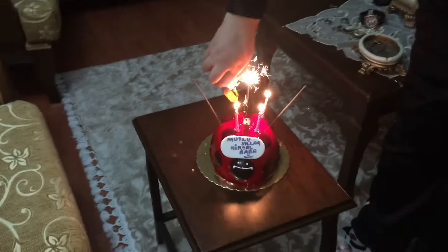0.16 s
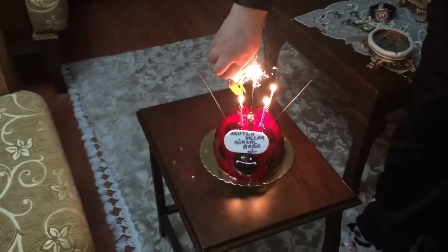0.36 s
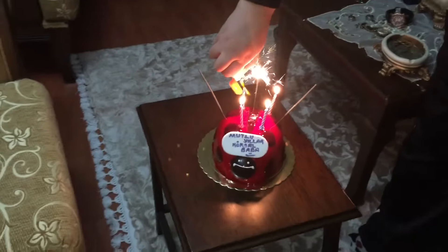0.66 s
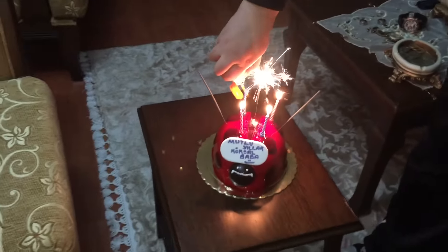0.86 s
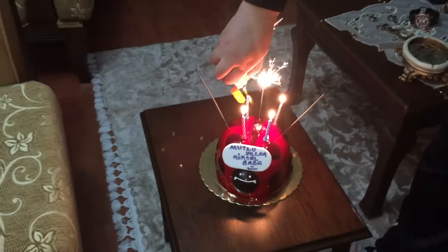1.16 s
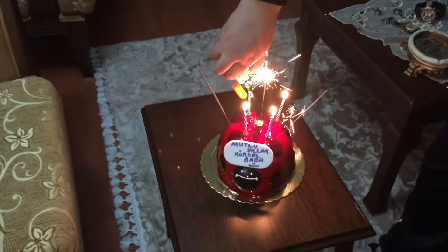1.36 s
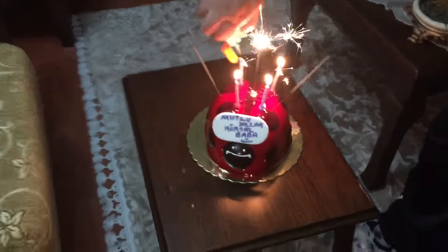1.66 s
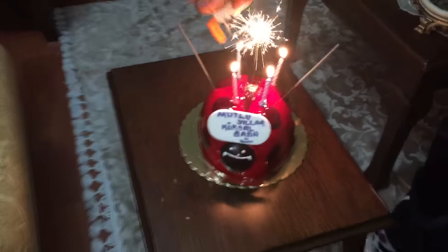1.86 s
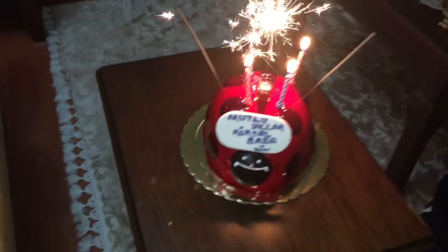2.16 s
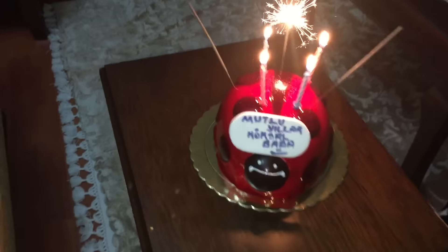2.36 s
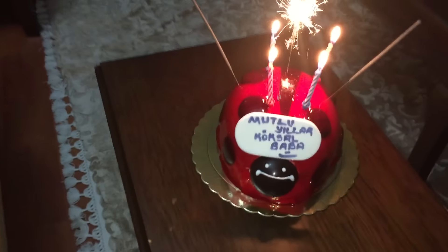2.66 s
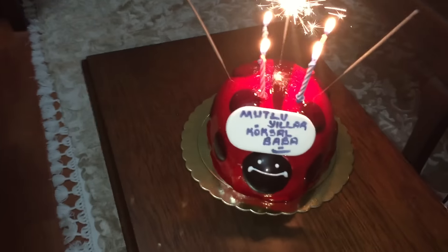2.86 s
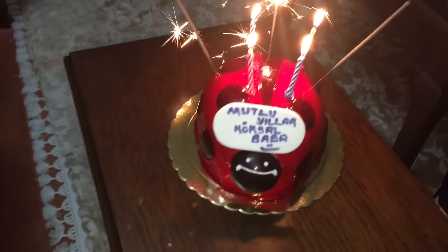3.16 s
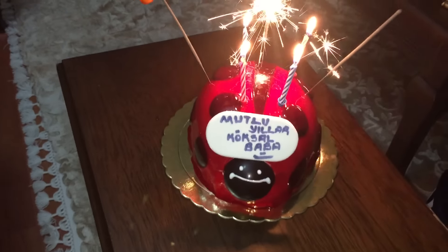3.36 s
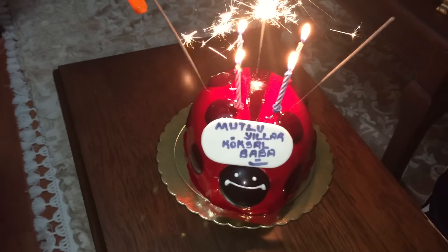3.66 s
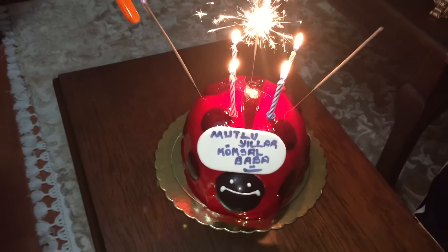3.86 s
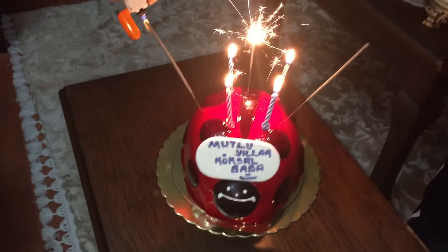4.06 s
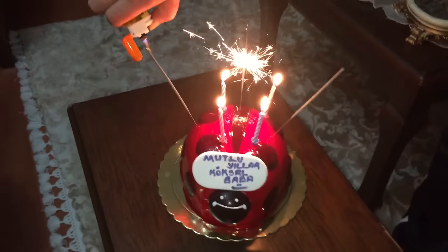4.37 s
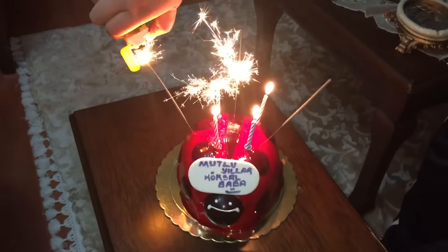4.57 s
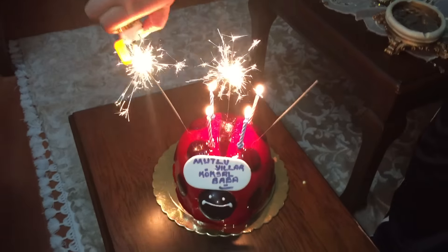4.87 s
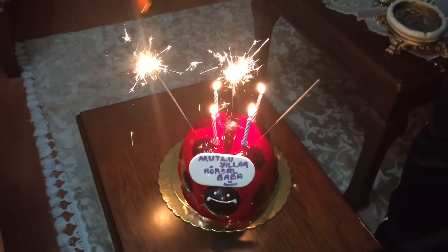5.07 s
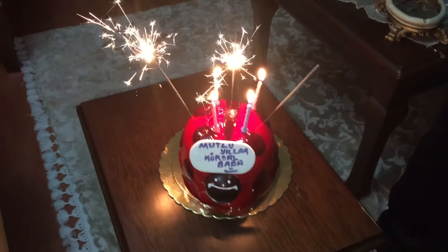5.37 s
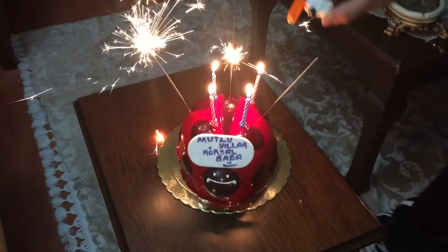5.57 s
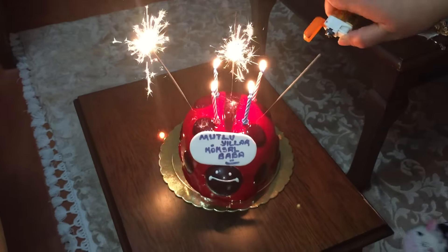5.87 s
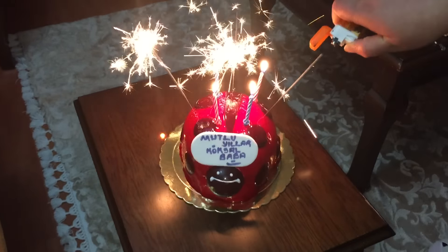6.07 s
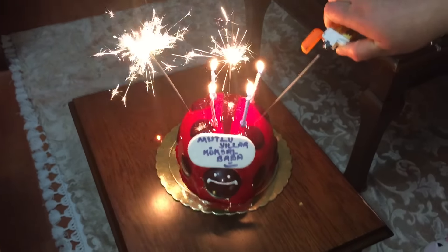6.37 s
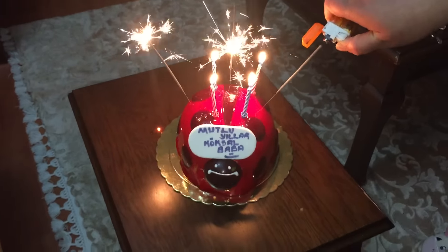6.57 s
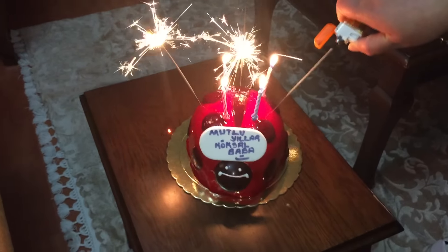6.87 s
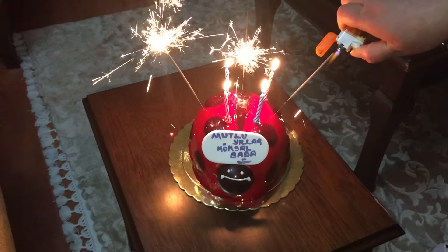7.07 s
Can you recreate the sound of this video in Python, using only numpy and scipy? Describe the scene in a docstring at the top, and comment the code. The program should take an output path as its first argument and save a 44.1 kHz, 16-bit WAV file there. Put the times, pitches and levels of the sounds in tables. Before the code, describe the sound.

A faint sizzling hiss swells into lively sparkler crackle, broken by hard, bright plastic lighter clicks in a quiet carpeted living room.

```python
"""Sparklers and a gas lighter, carpeted living room

Sparklers burn on a cake: a flickering fizz of tiny noise bursts over hiss, flaring up, with scattered pops.
A hand works a gas lighter, close and mostly direct: its trigger snaps loudly and ticks on release, each
blow a noise rattle through the modes of the body. Dull knocks are pushes of noise through a resonance.
Behind them the walls answer with decaying bands of noise; filtered noise gives the house rumble, hand on
the recorder and room tone. One microphone channel; the microphone moves over the table."""
import sys
import numpy as np
from scipy import signal
from scipy.fft import rfft, irfft, next_fast_len
from scipy.io import wavfile

SR = 44100
rng = np.random.default_rng(int(sys.argv[2]) if len(sys.argv) > 2 else 0)


def materialize(psi):
    """Save the field psi as 16-bit PCM at rate SR to the path in sys.argv[1].

    A 1-D psi becomes a single channel; in a 2-D psi each row is a channel.
    """
    bounded = np.clip(np.atleast_2d(psi).T, -1, 1)
    quanta = np.round(bounded * 32767).astype(np.int16)
    wavfile.write(sys.argv[1], SR, quanta)


N = 317961   # samples

# house and hand rumble over time: t/s, level of the 110 Hz rumble/dB, level of the deeper part/dB
RUMBLE_LEVELS = [(0, -65, -70), (.5, -72, -65), (.8, -66, -76), (1.33, -61, -69.5), (1.4, -68, -53.5),
                 (1.9, -57.5, -57), (2.2, -66.5, -68), (3.0, -66, -68), (3.5, -62.5, -61),
                 (4.2, -64.5, -70), (4.9, -63, -62.5), (5.6, -66, -69.5), (6.2, -65.5, -63.5),
                 (6.9, -62.5, -77), (7.21, -65, -66)]
# brief swells of the 110 Hz rumble: t of the top/s, top level/dB, last 10 dB of rise/ms, 10 dB of fall/ms
RUMBLE_SWELLS = [(.5, -61, 58, 150), (.86, -59, 100, 52), (1.375, -50, 8, 60), (1.45, -53, 30, 60),
                 (1.86, -69, 40, 84), (2.63, -56, 30, 100), (3.07, -53, 37, 38), (3.87, -51, 18, 60),
                 (4.34, -59, 28, 65), (4.851, -50, 40, 50), (5.14, -53.5, 100, 40), (5.5, -54, 39, 110),
                 (6.24, -57, 30, 150), (6.95, -56, 52, 48)]
# spectra of the rumble, its deeper part and the room tone, relative: f/Hz, density/dB per Hz
RUMBLE_SPECTRUM = [(60, -22), (85, -4.5), (113, 4.5), (131, 3), (160, -9), (200, -17.5), (250, -18),
                   (400, -33)]
DEEP_SPECTRUM = [(18, -80), (33, -52), (42, -23), (55, -1), (75, 2), (95, 1.5), (150, -61)]
AIR_SPECTRUM = [(100, -27), (170, -3.5), (290, 5.5), (400, 0.5), (480, -23), (1000, -29), (2100, -26),
                (5200, -47), (7500, -40), (8000, -27), (9500, -7.5), (10600, -11), (15740, -42),
                (15840, -70)]
# room tone over time: t/s, level/dB
AIR_LEVELS = [(0, -71.5), (1.5, -71), (2.2, -65.5), (2.7, -75), (4.2, -64), (5.0, -64), (5.4, -69),
              (6.4, -67), (7.21, -68)]
# decay of the room: f/Hz, t60/s
ROOM_DECAY = [(300, 0.16), (2100, 0.4), (4000, 0.39), (12000, 0.24)]
# strength of the room's answer: f/Hz, level/dB
ROOM_LEVELS = [(300, -30), (900, -45), (1500, -27), (2150, -23), (2800, -30.5), (3600, -30.5), (5000, -26),
               (6500, -29.5), (8500, -30.5), (12000, -30.5), (15500, -29.5)]
# dull knocks and low hand thumps: t/s, peak level/dB, f/Hz, width/Hz
KNOCK_EVENTS = [(0.2625, -53, 746, 220), (0.266, -47.5, 556, 160), (0.479, -49, 133, 50),
                (0.519, -56, 91, 40), (0.589, -51, 139, 60), (0.708, -46.5, 528, 60), (1.038, -52, 130, 70),
                (1.359, -43, 71.6, 40), (1.375, -48, 560, 200), (1.44, -44, 99, 40),
                (1.574, -48.5, 90, 40.2), (1.629, -53, 130, 60), (1.842, -46, 65, 30),
                (1.889, -48.5, 70, 40), (2.305, -45, 617, 150), (3.166, -42.5, 567, 150),
                (3.285, -47, 840, 200), (3.552, -49, 550, 150), (3.584, -46.5, 597, 150),
                (3.856, -38, 181, 80), (3.912, -48, 600, 150), (4.259, -49, 683, 150),
                (4.557, -49.5, 583, 150), (5.126, -41.5, 840, 350), (5.631, -44.5, 630, 150),
                (5.835, -49, 870, 150), (6.184, -46, 656, 150), (7.055, -51.5, 648, 148),
                (7.122, -37.5, 220, 110), (7.123, -40.5, 110, 60)]
# lighter trigger: t/s, peak level/dB, rattle t60 at 3 kHz/s, tilt/dB per octave, modes above 9 kHz/dB,
# hardest-hit tone f/Hz, second tone f/Hz, its level re the first/dB, third tone f/Hz, its level re the
# first/dB, all three tones re the body/dB, thump re the peak/dB
TRIGGER_EVENTS = [(2.048, -14.5, 0.007, 2.5, 0, 6060, 4520, -1, 8900, -3, 8, -34),
                  (2.8322, -4.5, 0.01, -1.9, 1.5, 3700, 5000, -1, 12800, -7, 8, -31),
                  (3.5052, -18, 0.0032, 2, -1, 5000, 3730, -3, 14100, -4, 3.5, -32),
                  (3.853, -3.5, 0.008, -1.7, 3.5, 4500, 1900, -0.5, 3880, 0, 5, -41),
                  (5.1563, -17, 0.0056, 5, -1.5, 4330, 2860, -1, 6160, 2, 8, -38),
                  (6.2007, -5, 0.012, 3.5, -5.5, 3670, 2160, 4.5, 6770, -7.5, 10, -34),
                  (6.739, -18, 0.0093, 4, 0, 4430, 7300, -0.5, 2310, -1, 18.5, -50),
                  (7.1184, -4.5, 0.011, 1.5, -1.5, 4950, 3730, -5, 2200, -1, 14, -45)]
# modes of the lighter body: f/Hz, width/Hz, level/dB
BODY_MODES = [(1570, 280, -3), (2200, 196, 7), (3610, 470, -1.5), (5005, 230, 10.5), (5170, 1040, 7),
              (7060, 1950, -5.5), (8970, 1900, -5), (11380, 1580, 4.5), (13300, 2500, 3), (16100, 1700, -5)]
# sparks bursting: t/s, peak level/dB, sputter t60/s, centre f/Hz
POP_EVENTS = [(.139, -45.5, 0.023, 2260), (0.2624, -47, .008, 5000), (0.486, -44, .005, 5000),
              (1.0435, -39.5, 0.031, 1950), (1.3733, -40, 0.019, 2160), (1.9065, -37, 0.01, 1920),
              (1.919, -32.5, 0.024, 2150), (1.953, -37.5, 0.023, 2100), (2.2588, -35.5, 0.011, 2130),
              (2.791, -47.5, 0.015, 1810), (3.1484, -30.5, 0.022, 1710), (3.1675, -37, 0.0089, 2270),
              (3.4577, -35, .015, 1900), (3.585, -27, 0.0068, 1824), (4.2712, -26.5, 0.008, 1790),
              (4.375, -40, 0.0087, 2200), (4.5587, -38, 0.019, 1540), (4.8035, -36, 0.031, 1913),
              (4.8594, -37, 0.017, 1960), (4.9116, -36, 0.022, 2030), (5.0316, -33, 0.011, 1760),
              (5.052, -32.5, .005, 8000), (5.187, -33.5, 0.011, 1880), (5.4492, -30.5, .008, 1680),
              (5.633, -27.5, 0.0081, 4480), (5.741, -34, 0.0051, 3470), (5.8369, -31, 0.0075, 2150),
              (6.1646, -29.5, 0.012, 2030), (6.234, -30, 0.03, 2240), (6.321, -31, 0.022, 3000),
              (6.4495, -41, 0.014, 2920), (6.512, -34, 0.0066, 6950), (6.53, -33.5, 0.012, 2050),
              (6.644, -36, 0.011, 2200), (6.7013, -31, 0.0041, 3200), (6.889, -29, 0.0089, 4330),
              (6.9606, -31, 0.013, 2180)]
# steady burn under the flares: t/s, fizz level/dB
BURN_LEVELS = [(0, -69), (.4, -66.5), (1.33, -64), (1.4, -63), (1.56, -59.5), (1.84, -60), (2.0, -55.5),
               (2.7, -52.5), (2.747, -71), (2.793, -52.5), (3.35, -55), (4.15, -51), (4.36, -57),
               (4.9, -53), (5.3, -54.5), (5.9, -53.5), (6.3, -50), (6.65, -53.5), (7.21, -52.5)]
# the burning coat flares up: t of the top/s, top level/dB, last 10 dB of rise/ms, 10 dB of fall/ms
# (no slope is quicker than 8 ms)
FLARE_EVENTS = [(0.014, -61, 39, 43), (.14, -60, 50, 40), (.264, -57, 30, 30), (.525, -61.5, 34, 23),
                (.59, -62, 23, 40), (.72, -61.5, 48, 80), (.915, -60, 35, 23), (1.045, -61, 68, 13),
                (1.27, -68.5, 30, 15), (1.39, -53.5, 15, 60), (1.43, -56, 30, 54), (1.5, -58, 30, 30),
                (1.755, -53.5, 58, 36), (1.92, -53, 30, 40), (2.075, -48, 48, 115), (2.3, -46, 52, 45),
                (2.405, -47, 40, 25), (2.665, -56, 35, 10), (3.07, -50.5, 83, 50), (3.17, -43.5, 28, 120),
                (3.28, -52.5, 66, 18), (3.41, -49.5, 40, 52), (3.63, -52, 11, 5), (3.72, -52, 21, 33),
                (4.27, -46.5, 44, 30), (4.376, -54.5, 10, 41), (4.555, -52, 63, 13), (4.66, -49.5, 29, 58),
                (4.715, -46.5, 26, 18), (4.865, -44, 16, 12), (4.915, -48, 22, 33), (5.034, -44, 41, 46),
                (5.15, -45.5, 53, 56), (5.4, -49, 30, 55), (5.591, -49.5, 63, 41), (5.84, -49.5, 50, 40),
                (6.026, -51, 32, 39), (6.171, -45, 21, 90), (6.52, -47.5, 35, 48), (6.9, -50, 32, 60),
                (6.965, -54, 20, 50)]
# spectra of the treble, 2 kHz and 600 Hz fizz bands, relative: f/Hz, density/dB per Hz
HIGH_SPECTRUM = [(1500, -59), (2700, -4), (3230, -3), (3830, -6), (4500, -1.5), (5350, -4), (6350, -7),
                 (7600, -6.5), (9500, -4), (10600, -7), (12000, -3.5), (13800, -5), (15740, -4.5),
                 (15840, -46)]
MID_SPECTRUM = [(710, -73), (1200, -5), (1800, 5), (2130, 8.5), (2500, -1), (3250, -41), (5500, -120)]
LOW_SPECTRUM = [(240, -4), (400, -8.5), (599, 3), (786, -5.5), (862, -5.5), (1200, -12.5), (1560, -20.5),
                (2640, -120)]
# treble row, then 2 kHz row: level re the fizz at the opening burn level/dB, change/dB per dB of burn
BAND_BALANCE = [(-1, -0.1759), (-3, -0.1049)]
# lower fizz bands: t/s, level of the 600 Hz band re the fizz/dB, level of the 3 kHz band re the fizz/dB
LOWER_BANDS = [(0, -5.5, -14), (.5, -1.5, -14), (1.2, -5.5, -18), (1.6, -10, -11), (2.75, -13, -16),
               (3.1, -10, -16), (4.2, -10, -20), (5.2, -15, -17), (5.6, -10.5, -10), (6, -14, -12),
               (6.4, -13.5, -11.5), (7.21, -11.5, -12)]
# gliding treble band: t/s, f/Hz, level re the fizz/dB, table echo share/0-1
GLIDE_PATH = [(0, 6540, -17, 0.15), (1.6, 6570, -26, 0.18), (2.3, 6600, -15, 0.19), (3.1, 6670, -11, 0.12),
              (3.8, 6440, -12, 0.12), (4.6, 6000, -13.5, 0.27), (5.2, 6120, -13, 0.2),
              (5.7, 6250, -11.5, 0.2), (7.21, 6290, -10.5, 0.04)]

BOUNCE_MS, BOUNCE_DB = 4.7, -17   # the lighter's hammer lands once more
BURN_TOP_HZ = 15800   # a steep low-pass closes the burn, pops, room answer and rumble here
CUTOFF_HZ = 17300   # everything is 70 dB down from here up


def from_db(db):
    """Gain of a level."""
    return 10 ** (np.asarray(db) / 20)


def rms_one(x):
    """Scaled to rms 1."""
    return x / np.sqrt(np.mean(x ** 2) + 1e-20)


def in_time(rows):
    """Each column after t/s as a curve over all samples."""
    s, *columns = np.transpose(rows)
    return [np.interp(np.arange(N) / SR, s, column) for column in columns]


def at_hz(points, hz):
    """A spectrum read on a log frequency axis."""
    points = np.array(points)
    return np.interp(np.log(hz), np.log(points[:, 0]), points[:, 1])


def colour(x, spectrum):
    """Shapes white sound to a spectrum; rms 1."""
    size = next_fast_len(N)
    hz = np.maximum(np.arange(size // 2 + 1) * SR / size, 1)
    shaped = rfft(x, size) * from_db(at_hz(spectrum, hz))
    return rms_one(irfft(shaped, size)[:N])


def drift(rate_hz):
    """Slow random wander of rms 1: noise through two equal low-pass poles, drawn every 40 samples."""
    r = np.exp(-80 * np.pi * rate_hz / SR)
    slow = signal.lfilter([1], [1, -2 * r, r * r], rng.standard_normal(N // 40 + 2002))
    slow = slow[2000:]   # past the filter's start
    return np.interp(np.arange(N) / 40, np.arange(len(slow)), rms_one(slow))


def resonance(x, hz, width_hz):
    """One damped mode: a band-pass of gain about 1 on top."""
    r = np.exp(-np.pi * abs(width_hz) / SR)
    feed = [(1 - r * r) / 2, 0, (r * r - 1) / 2]
    return signal.lfilter(feed, [1, -2 * r * np.cos(2 * np.pi * hz / SR), r * r], x)


def add(out, s, sound, peak_db):
    """Mixes a short sound in at a time, at a peak level."""
    at = round(s * SR)
    scaled = from_db(peak_db) * sound / np.abs(sound).max()
    out[at:at + len(sound)] += scaled[:N - at]


def with_swells(steady_db, rows):
    """Gain of a steady level with swells added in power, each rising to its top and dying away."""
    t = np.arange(0, N, 16) / SR
    swells = 0
    for s, top_db, rise_ms, fall_ms in rows:
        rise, fall = (s - t) * 1000 / max(rise_ms, 8), (t - s) * 1000 / max(fall_ms, 8)
        below_top_db = 10 * np.where(t < s, rise, fall)
        swells = swells + from_db(2 * (top_db - below_top_db))   # doubled dB: power
    return np.sqrt(from_db(2 * steady_db) + np.interp(np.arange(N) / SR, t, swells))


def rumble():
    """Lumpy low noise of the house and of the hand on the recorder, over the room tone."""
    level_db, deep_db = in_time(RUMBLE_LEVELS)
    air_db = in_time(AIR_LEVELS)[0]
    low = colour(rng.standard_normal(N) * from_db(0.5 * drift(3.5)), RUMBLE_SPECTRUM)
    deep = colour(rng.standard_normal(N) * from_db(4.7 * drift(12.0)), DEEP_SPECTRUM)
    air = colour(rng.standard_normal(N) * from_db(2.8 * drift(10.5)), AIR_SPECTRUM)
    return with_swells(level_db, RUMBLE_SWELLS) * low + from_db(deep_db) * deep + from_db(air_db) * air


def room(events):
    """The walls gather each snap from all sides: third-octave noise bands, each dying at its own rate."""
    power, out = np.full(N, 1e-18), 0
    power[[round(row[0] * SR) for row in events]] = from_db([2 * row[1] for row in events])
    fill = np.exp(-1 / (0.00065 * SR))   # reflections take a moment to build up
    power = signal.lfilter([1 - fill], [1, -fill], power)
    edges = 250 * 2 ** np.arange(0, 6, 1 / 3.01)
    white = rng.standard_normal((2, N))   # neighbouring bands take different noise
    for k, (low, high) in enumerate(zip(edges, edges[1:])):
        hz = np.sqrt(low * high)
        band_pass = signal.butter(2, [low, high], "band", fs=SR, output="sos")
        band = signal.sosfilt(band_pass, white[k % 2])
        decay = from_db(-2 * 60 / (at_hz(ROOM_DECAY, hz) * SR))   # power kept per sample
        left = signal.lfilter([1], [1, -decay], power)
        out = out + band * np.sqrt(left) * from_db(at_hz(ROOM_LEVELS, hz))
    # the lighter's main modes carry on
    modes = 1.8 * resonance(out, 2120, 55) + 2.8 * resonance(out, 3590, 110) + 0.26 * resonance(out, 4800, 250)
    return out + modes


def knocks():
    """Soft contacts and hand thumps: a short push of noise rings briefly round one dull pitch."""
    out, t = np.zeros(N), np.arange(3500) / SR
    noises = rng.standard_normal((len(KNOCK_EVENTS), 3500))
    for (s, peak_db, hz, width_hz), noise in zip(KNOCK_EVENTS, noises):
        push = 0.34 * noise * np.exp(-t / 0.0041)
        push[0] = 5.2   # first touch
        ring = resonance(resonance(push, hz, 1.38 * width_hz), hz, width_hz)
        add(out, s, ring, peak_db)
    return out


def struck(draw, t60, hz, width_hz, db):
    """One body mode under the hammer's rattle; its energy is set by its level and width."""
    t = np.arange(len(draw)) / SR
    strike = .0007   # s after the first touch
    quick = (hz / 3000) ** 0.1   # later contacts are softer: the treble dies first
    held = np.maximum(t - strike - 0.0012 / quick, 0)   # s since the rattle began to fade
    fade = from_db(-60 * held * quick / max(t60, .002))
    rattle = np.tanh(draw) * np.where(t < strike, 0.19 * t / strike, 0.68 * fade)
    rattle[round(strike * SR)] = 2.56   # the blow itself
    late = round(BOUNCE_MS * SR / 1000)
    rattle[late:] += from_db(BOUNCE_DB) * rattle[:-late]
    return from_db(db) * np.sqrt(abs(width_hz)) * rms_one(resonance(rattle, hz, width_hz))


def lighter():
    """The sprung hammer strikes and rattles for milliseconds in the damped plastic body, which also thumps."""
    out, t = np.zeros(N), np.arange(2500) / SR
    thump = np.sin(2 * np.pi * 230 * t) * t * from_db(-60 * t / 0.0073)
    draws = rng.standard_normal((len(TRIGGER_EVENTS), 2500))
    for event, draw in zip(TRIGGER_EVENTS, draws):
        s, peak_db, t60, tilt_db, top_db, hit_hz, next_hz, next_db, third_hz, third_db, ping_db, thump_db = event
        modes = []
        for hz, width_hz, db in BODY_MODES:
            mode_db = db + tilt_db * np.log2(hz / 5000) + top_db * (hz > 9000)
            modes.append(struck(draw, t60, hz, width_hz, mode_db))
        # the tones under the blow stand out
        tones = ((hit_hz, 0), (next_hz, next_db), (third_hz, third_db))
        pings = sum(struck(draw, t60, hz, 0.067 * hz, ping_db + db) for hz, db in tones)
        body = sum(modes[::2]) - sum(modes[1::2])   # alternating signs fill the valleys
        add(out, s, body + pings, peak_db)
        add(out, s, thump, peak_db + thump_db)
    return out


def pops():
    """A bursting spark is a snap and a short sputter of noise, broad with one stronger region."""
    out, t = np.zeros(N), np.arange(2000) / SR
    noises = rng.standard_normal((len(POP_EVENTS), 2000))
    for (s, peak_db, t60, hz), noise in zip(POP_EVENTS, noises):
        puff = noise * from_db(-60 * t / max(t60, .002))
        puff[0] = 5.7   # the snap
        broad = 0.11 * resonance(puff, 6700, 11000)
        add(out, s, broad + resonance(puff, hz, 0.28 * hz), peak_db)
    return out


def patches(x, patchy_db):
    """Narrow treble regions swell and sink on their own as sparks fly about."""
    changes = 0
    for hz in np.geomspace(2800, 14500, 10):
        changes = changes + (from_db(patchy_db * drift(2.6)) - 1) * resonance(x, hz, 0.14 * hz)
    return x + changes


def crackle(per_s, spread_db, cycles):
    """Flying sparks split with lone uneven ticks, each ringing a few cycles at one of nine pitches; rms 1."""
    sizes = from_db(spread_db * np.minimum(rng.exponential(1, N), 4))
    ticks = sizes * (rng.random(N) < per_s * from_db(4.0 * drift(8.0)) / SR)   # the rate wanders
    dealt = rng.integers(0, 9, N)
    rings = 0
    for k, hz in enumerate(np.geomspace(1600, 14500, 9)):
        rings = rings + resonance(ticks * (dealt == k) + 1e-18, hz, hz / cycles)
    return rms_one(rings)


def table_echo(x, delay_s, share):
    """A reflection a fraction of a millisecond late and inverted cuts evenly spaced gaps."""
    return x - share * np.interp(np.arange(N) - delay_s * SR, np.arange(N), x)


def nearby(x, t60, wet_db):
    """Reflections off the furniture, a fading noise tail, give the burn a fine, fixed ripple of peaks."""
    t = np.arange(1, 6000) / SR
    tail = rng.standard_normal(len(t)) * t * from_db(-60 * t / t60)
    return x + from_db(wet_db) * signal.oaconvolve(x, tail / np.linalg.norm(tail))[:N]


def fizz(per_s, spread_db, hiss, flicker_db, patchy_db):
    """Thousands of uneven micro-bursts over the hiss of the burning coat, flaring together."""
    sizes = from_db(spread_db * np.minimum(rng.exponential(1, N), 5)) * rng.choice([-1, 1], N)
    bursts = rms_one(sizes * (rng.random(N) < per_s * from_db(3.0 * drift(20)) / SR))   # the rate wanders
    white = (bursts + hiss * rng.standard_normal(N)) * from_db(flicker_db * drift(45))
    white = patches(white, patchy_db=0.5)

    burn_db = in_time(BURN_LEVELS)[0]
    glide_hz, glide_db, echo = in_time(GLIDE_PATH)
    low_db, three_db = in_time(LOWER_BANDS)
    stronger_db = burn_db - BURN_LEVELS[0][1]
    high_db, mid_db = (db + per_db * stronger_db for db, per_db in BAND_BALANCE)
    bands = 0
    for db, spectrum in ((high_db, HIGH_SPECTRUM), (mid_db, MID_SPECTRUM), (low_db, LOW_SPECTRUM)):
        bands = bands + from_db(db + patchy_db * drift(19.0)) * colour(white, spectrum)
    three_khz = rms_one(resonance(resonance(white, 3100, 1270), 3100, 1270))
    bands = bands + from_db(three_db) * three_khz

    # one treble band slides as the microphone moves over the table: dull noise carried on a moving centre
    dull = signal.sosfilt(signal.butter(2, 600, fs=SR, output="sos"), white)
    glide = rms_one(dull * np.cos(2 * np.pi * np.cumsum(glide_hz) / SR))

    sparks = bands + from_db(-11.5) * crackle(per_s=350, spread_db=4.5, cycles=7.3)
    sparks = table_echo(sparks, 2.456 / glide_hz, np.clip(echo, 0, 1))   # the gaps slide with the band
    burning = with_swells(burn_db, FLARE_EVENTS) * (sparks + from_db(glide_db) * glide)
    return nearby(burning, t60=0.12, wet_db=-8.0)


def scene():
    """All sources at the microphone; trigger and pops excite the room."""
    burn = fizz(per_s=3000, spread_db=2.5, hiss=0.93, flicker_db=1.7, patchy_db=1.0)
    burn = burn + pops() + room(TRIGGER_EVENTS + POP_EVENTS)
    low_pass = signal.ellip(10, .5, 60, BURN_TOP_HZ, fs=SR, output="sos")
    burn = signal.sosfilt(low_pass, burn + rumble())
    return (lighter() + knocks() + burn)[None]


def record(dry):
    """A steep low-pass cuts the top."""
    return signal.sosfilt(signal.cheby2(12, 70, CUTOFF_HZ, fs=SR, output="sos"), dry)


dry = scene()
out = record(dry)
materialize(out)
```